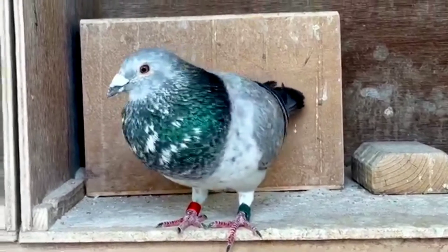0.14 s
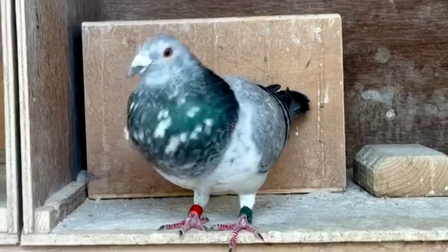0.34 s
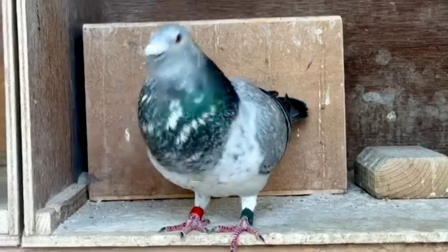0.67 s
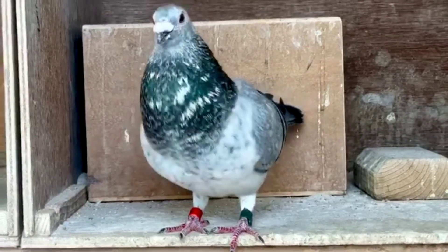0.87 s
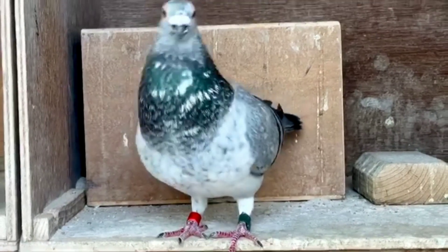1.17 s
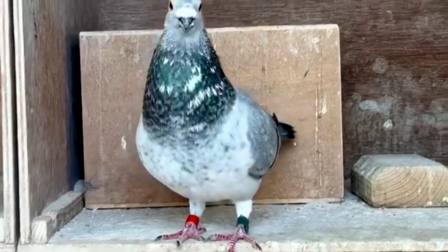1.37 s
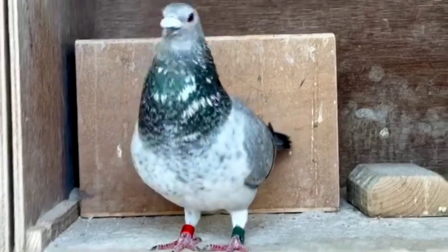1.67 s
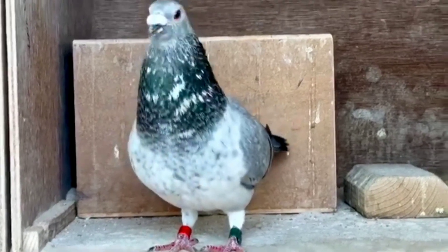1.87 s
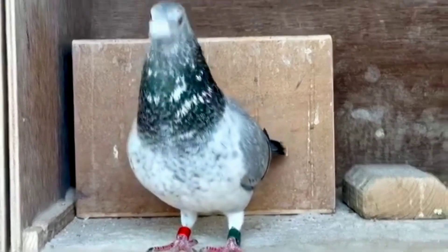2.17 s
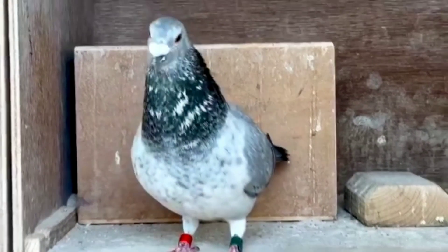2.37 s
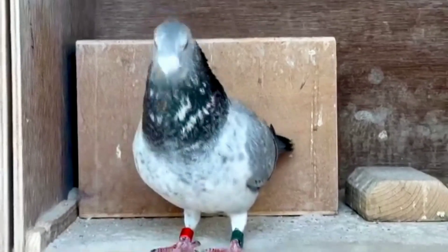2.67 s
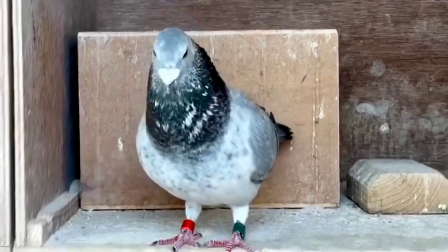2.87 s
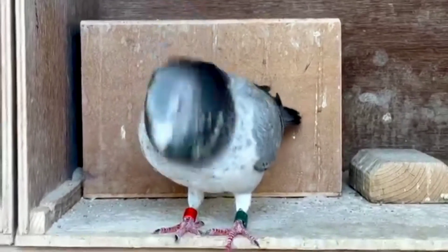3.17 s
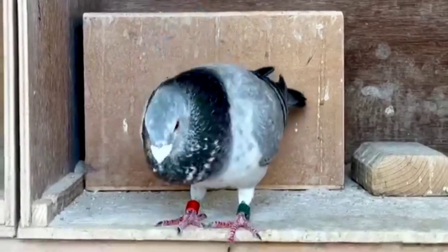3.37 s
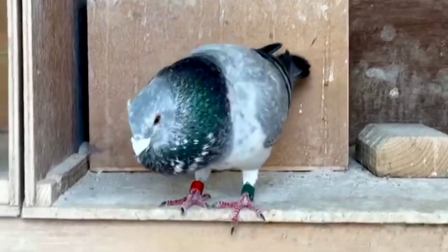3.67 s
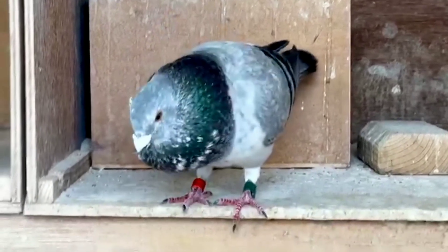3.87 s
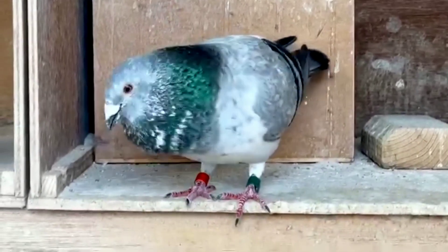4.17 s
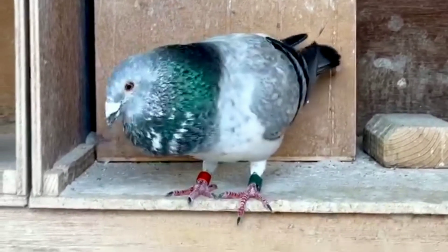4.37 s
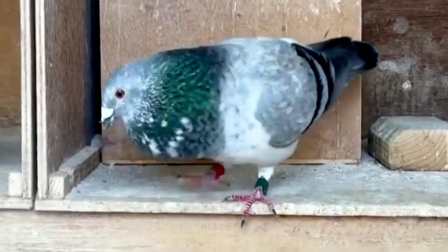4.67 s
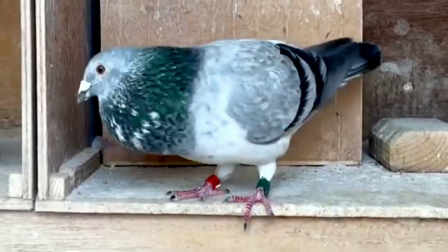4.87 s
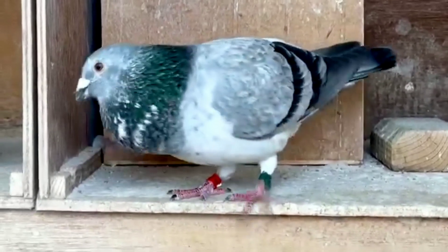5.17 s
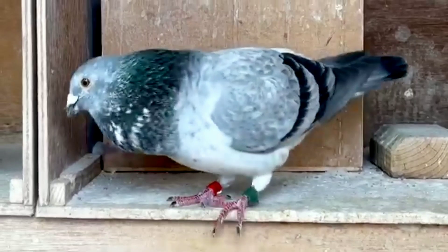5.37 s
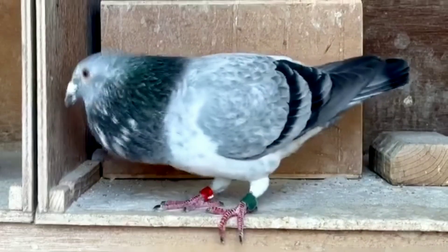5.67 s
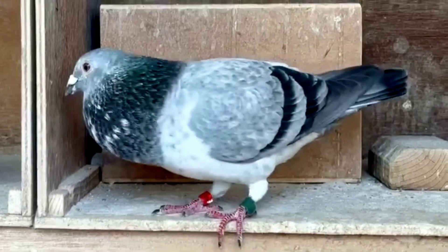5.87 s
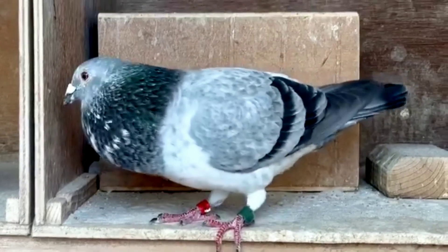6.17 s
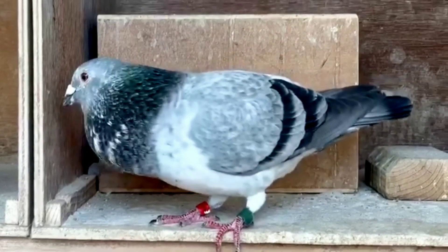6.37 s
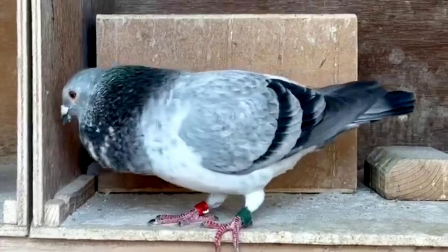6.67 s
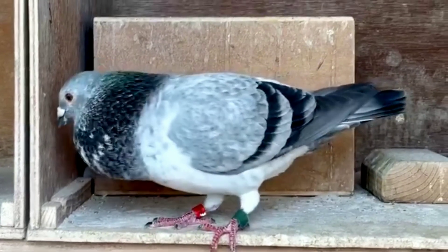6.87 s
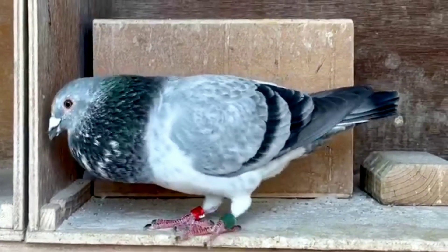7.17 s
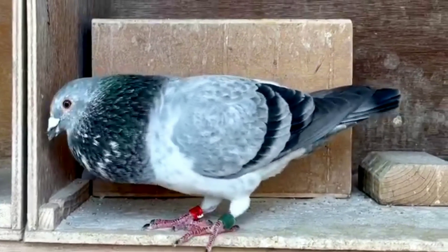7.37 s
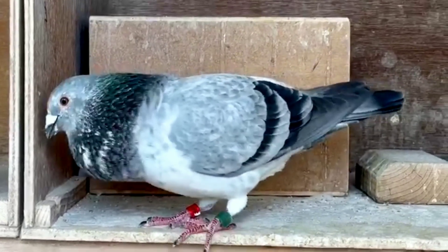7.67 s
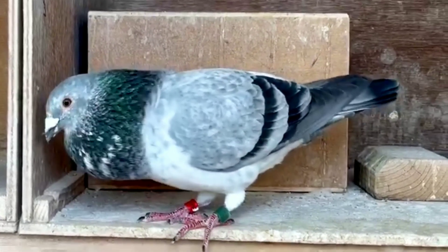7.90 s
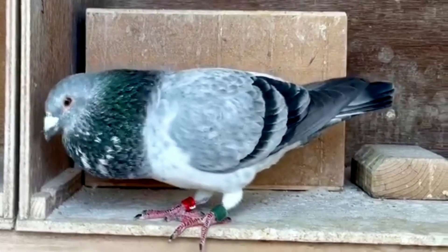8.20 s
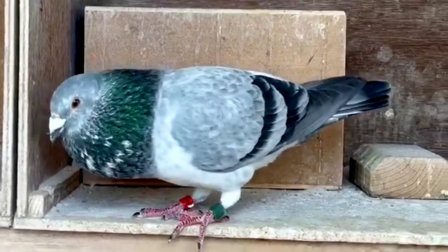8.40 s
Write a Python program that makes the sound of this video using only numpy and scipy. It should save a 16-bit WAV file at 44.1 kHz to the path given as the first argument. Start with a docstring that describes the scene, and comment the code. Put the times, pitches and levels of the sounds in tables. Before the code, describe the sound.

Pigeons coo and growl in a wooden loft; early wingbeats end in low landing thumps, then overlapping throaty coos build louder.

```python
"""Pigeons in a wooden loft

Near birds coo over one another: swept harmonic tones that roll in rough pulses or run almost pure.
Growls are pulsed tones; the flock behind is layers of many short overlapping ones.
One bird flaps past (blurred feather buzz and air noise) and lands with low thumps of ringing board modes,
then a long brush of feathers. Noise swishes and scratches are feathers and feet; thin tones squeak faintly.
Low noise rumbles, a soft stir of noise lies under it all, and a dense noise tail gives the wooden walls."""
import sys
import numpy as np
from scipy import signal
from scipy.io import wavfile
from scipy.ndimage import uniform_filter1d

SR = 44100
rng = np.random.default_rng(int(sys.argv[2]) if len(sys.argv) > 2 else 0)


def dump_mix(stems):
    """Bounce the given channels to the path in sys.argv[1] as a 16-bit WAV at rate SR."""
    frames = np.atleast_2d(stems).T  # one column per channel
    limited = np.clip(frames, -1, 1)  # hard clip at full scale
    pcm = np.round(limited * 32767).astype(np.int16)
    wavfile.write(sys.argv[1], SR, pcm)


N = 376613
TIME = np.arange(N) / SR

# Levels in the tables are those of each layer before its own filters and the trims in scene().

# Long coos of the nearest birds: (second harmonic level/dB, third harmonic level/dB, curve);
# harmonics at the loudest point; curve rows: (t/s, f/Hz, level/dB, roll depth 0-1)
LONG_COOS = [ (-56, -72, [(2.6, 281.7, -42, 0.2), (2.646, 291.4, -26.5, 0), (2.718, 312.7, -39, 0.1),
             (2.778, 288.3, -33, 0.3), (2.8, 279.1, -48, 0.1)]), (-54, -63.5, [(4.3, 128.4, -51, 0.4),
             (4.316, 134.6, -42, 0.4), (4.464, 183.9, -37, 0.4), (4.586, 225.9, -30, 0.4),
             (4.702, 248.3, -29, 0.4), (4.83, 245.7, -36, 0.4), (4.87, 235.3, -34, 0.4)]),
             (-45.5, -64.5, [(5.35, 154.3, -36.5, 0.04), (5.452, 209, -36.5, 0),
             (5.528, 223.5, -32.5, 0.15), (5.594, 237.7, -41, 0), (5.82, 254.3, -28.5, 0.34),
             (5.95, 270.3, -21.5, 0.08), (6.106, 264.4, -27, 0.1), (6.26, 244, -31.5, 0.1)]),
             (-48.5, -58, [(5.53, 288, -32, 0.4), (5.64, 306.7, -26.5, 0.3), (5.69, 325, -18.5, 0.15),
             (5.75, 318, -20.5, 0.27), (5.84, 322.8, -16.5, 0.1), (5.86, 313.5, -24.5, 0.24),
             (5.97, 277.1, -29, 0.44), (6.04, 246, -24.5, 0.36), (6.11, 181, -37.5, 0.46)]),
             (-59, -66.5, [(6.47, 301.5, -25.5, 0.02), (6.53, 311, -22, 0.5), (6.575, 324.3, -15.5, 0.25),
             (6.61, 326, -25.5, 0.15), (6.66, 326, -15, 0.37), (6.74, 304.6, -28.5, 0.5)]),
             (-56.5, -62.5, [(6.75, 266.6, -30, 0.3), (6.826, 274, -24, 0.27), (6.836, 278.1, -32, 0.3),
             (6.918, 305, -29, 0.4), (7.098, 270.1, -28.5, 0.45), (7.108, 266.3, -33, 0.2),
             (7.17, 259.5, -34, 0.3)]), (-55, -62.5, [(7.18, 262.7, -26, 0.4), (7.33, 302, -22, 0.9),
             (7.37, 312.6, -14.5, 0), (7.43, 317, -11.5, 0), (7.51, 312, -15, 0.15),
             (7.55, 335.3, -21, 0.37), (7.58, 354, -28.5, 0.55)]), (-56.5, -67.5, [(7.585, 352, -20.5, 1),
             (7.62, 331.4, -24.5, 0.68), (7.65, 322.5, -14, 0.26), (7.71, 316.5, -14.5, 0.04),
             (7.75, 295.2, -23.5, 0.04), (7.85, 273.9, -22.5, 0.75), (7.93, 249, -30, 0.37)]),
             (-50.5, -63.5, [(7.98, 297.2, -28.5, 0.6), (8.05, 319.8, -22.5, 0), (8.15, 321, -16, 0.16),
             (8.18, 341, -22, 0.7), (8.25, 333, -19.5, 0.27), (8.37, 321.6, -11.5, 0),
             (8.427, 321, -12.5, 0), (8.45, 299, -31.5, .2), (8.53, 253.6, -31, 0.44)]), ]
RASP_DB, RASP_BAND_HZ = -55, (470, 850)   # air that puffs through the throat with each pulse of the roll


def long_coos(jitter, roll_hz, unevenness, follow, blur_hz, blur):
    """One unbroken glide per coo: pulses set its roll and rasp, and faint overtones waver above."""
    out = np.zeros(N)
    air = rms_one(butter(rng.standard_normal(N), RASP_BAND_HZ, "band", order=3))
    for second_db, third_db, curve in LONG_COOS:
        at, t, gate = call_span(curve, fade_s=.02)
        size = len(t)
        hz, level_db, roll = in_time(curve, t)
        phase = turns(hz * (1 + jitter * drift(110, size)))
        cycle = turns(roll_hz * np.exp(unevenness * drift(40, size)))
        tone = from_db(level_db) * (1 + roll * np.sin(cycle)) * np.sin(phase)
        for k, harmonic_db in (2, second_db), (3, third_db):
            # overtones follow only a share of the level's fall from its crest
            overtone_db = harmonic_db + follow * (level_db - level_db.max())
            wavering = 1 + blur * narrow_noise(blur_hz, size)
            tone += from_db(overtone_db) * np.real(wavering * np.exp(1j * k * phase))
        puffs = np.maximum(np.sin(cycle), 0) ** 2
        rasp = from_db(RASP_DB) * roll * puffs * air[at]
        out[at] += np.sqrt(2) * gate * (tone + rasp)
    return out


# Short coos, each an arch of effort: (start t/s, rise/s, fall/s, start f/Hz, crest f/Hz, end f/Hz,
# crest level/dB, swell from start to crest/dB, overtone level/dB against the fundamental)
COOS = [ (0.0, 0.021, 0.1, 305, 316.7, 288, -16.5, -8.5, -12),
        (0.04, 0.23, 0.056, 337.2, 324, 300, -18, 11.5, -18),
        (0.151, 0.083, 0.14, 294.7, 276.4, 271, -26, 2, -28),
        (0.41, 0.031, 0.088, 323.5, 322, 309, -28, 10, -6),
        (0.549, 0.061, 0.12, 336, 324, 299.5, -39.5, -10, -2),
        (0.71, 0.074, 0.04, 194.3, 224, 250, -30.5, 8.5, -3),
        (2.02, 0.047, 0.043, 279, 286, 277, -40, -4, 12), (2.27, 0.011, 0.044, 320, 293, 300, -31, 13, 5),
        (2.32, 0.13, 0.06, 159, 161, 160, -38, -4, -21), (2.44, 0.027, 0.13, 299.5, 274.3, 273, -34, 10, 0),
        (2.947, 0.021, 0.055, 281, 279, 280, -44, 4, 16),
        (3.11, 0.074, 0.26, 216.5, 239, 208, -34.5, -4, -4.5),
        (3.17, 0.074, 0.11, 107.2, 113.1, 107, -44, -2, -1),
        (3.291, 0.033, 0.17, 177, 167.7, 156, -33.5, 4, -23),
        (3.46, .17, 0.068, 221.8, 238.3, 234, -26.5, 11, -5.5),
        (3.73, 0.036, 0.1, 231, 225.5, 168.4, -21.5, 3, -6.5),
        (3.941, 0.028, 0.12, 247, 254, 264.5, -19.5, 8, -4.5),
        (4.1, 0.047, 0.19, 258, 262.6, 244.2, -24, -2, -2),
        (4.13, 0.047, 0.14, 321, 321.7, 325, -27, 2, -18),
        (4.661, 0.27, 0.19, 327, 314.7, 295, -29.5, 12, 10.5),
        (5.19, 0.074, 0.12, 289.7, 302.8, 268, -24.5, 8, 2.5),
        (6.209, 0.067, 0.042, 258.7, 293.6, 287, -26, 15, 0.5),
        (6.9, 0.083, 0.1, 318, 321.5, 321, -27, 6, -3.5),
        (6.91, 0.11, 0.079, 188.4, 224, 254, -26, 8.5, -8.5),
        (7.26, 0.034, 0.05, 182.7, 205.4, 232, -24, 9, -5),
        (7.78, 0.14, 0.046, 125.1, 207.3, 214.6, -31.5, 4, 1.5),
        (7.87, 0.041, 0.037, 299, 318, 316, -21, 7, 0.5), ]
# What the inflated crop passes: (f/Hz, level/dB)
CROP = [(140, -6), (195, -6.5), (250, -4.5), (320, -0.5), (400, 3.5), (500, -13.5), (640, -32),
        (960, -41.5), (1300, -56)]
# loss by the end of a coo; how late the level and the pitch give way (exponents)
COO_FADE_DB, SWELL_CURVE, DROOP_CURVE = 7, 1.25, 1.6


def hoots(jitter, flutter_db, throb_db, rough, clean_db, third_db, blur, fade_s):
    """Level and pitch arch with effort, the crop colours the harmonics; soft parts roll, loud parts run clean."""
    out = np.zeros(N)
    for s, rise_s, fall_s, first_hz, crest_hz, last_hz, crest_db, swell_db, overtones_db in COOS:
        at, t, gate = call_span([(s,), (s + rise_s + fall_s,)], fade_s)
        size = len(t)
        to_go = np.clip(1 - (t - s) / rise_s, 0, 1)
        spent = np.clip((t - s - rise_s) / fall_s, 0, 1)
        hz = crest_hz + (first_hz - crest_hz) * to_go ** DROOP_CURVE
        hz += (last_hz - crest_hz) * spent ** DROOP_CURVE
        level_db = crest_db - swell_db * to_go ** SWELL_CURVE - COO_FADE_DB * spent ** SWELL_CURVE
        phase = turns(hz * (1 + jitter * drift(90, size)))
        roll = np.sin(turns(72 * (1 + .35 * drift(45, size))))   # about 72 pulses per second
        looseness = 1 / (1 + from_db(level_db - clean_db))   # near 1 when soft, near 0 when loud
        tone = from_db(at_hz(CROP, hz)) * np.sin(phase)
        for k, harmonic_db in (2, overtones_db), (3, overtones_db + third_db):
            gain = from_db(harmonic_db + at_hz(CROP, k * hz))
            tone += gain * np.sin(k * phase + blur * drift(130, size))
        unsteady_db = flutter_db * drift(50, size) + throb_db * drift(21, size)
        level = from_db(level_db + looseness * unsteady_db)
        out[at] += gate * np.sqrt(2) * tone * (1 + rough * looseness * roll) * level
    return out


# Rolling growls: (crest t/s, level/dB, rise/s, fall/s, f/Hz at the crest, glide in octaves per s)
GROWLS = [ (.1, -39.5, 0.071, 0.1, 501.4, -0.5), (0.249, -26, 0.036, 0.036, 386, -2),
          (.45, -34, 0.034, 0.06, 415, 1), (0.665, -32, .025, .025, 411.4, 0),
          (0.751, -33.5, .04, 0.035, 375.5, -1.5), (0.871, -36, 0.042, 0.027, 426, -1.5),
          (1.674, -46.5, .02, 0.018, 433, 1), (1.896, -41, .02, 0.014, 419, -1.5),
          (1.91, -47.5, .018, 0.033, 614, 0.5), (2.07, -45, 0.038, 0.027, 469, -3),
          (2.33, -41.5, .025, 0.025, 423.6, 1), (2.54, -50, 0.07, 0.092, 542, 0.5),
          (1.969, -44, 0.028, 0.02, 400, 1.5), (2.211, -33, 0.033, 0.025, 412, 1.5),
          (2.215, -36.5, .035, 0.031, 366.4, 0), (2.691, -40, 0.039, 0.11, 437, -1.7),
          (2.809, -34, .035, 0.079, 418.6, 0.5), (3.14, -38.5, .03, 0.041, 441, 0),
          (3.27, -37.5, .04, 0.048, 416, 0), (3.249, -45, .06, 0.068, 495, -0.5),
          (3.879, -41, .1, 0.068, 498, 1), (3.59, -32.5, 0.049, 0.066, 368, 3),
          (3.86, -26.5, 0.059, 0.06, 390, 1), (3.98, -32.5, 0.029, 0.082, 368, 1),
          (4.16, -30.5, 0.038, 0.052, 421, 1), (4.26, -25, .035, 0.046, 417.2, -2),
          (4.52, -26.5, .06, 0.063, 388.5, 2.5), (4.73, -31.5, 0.14, 0.094, 423.7, 1.8),
          (4.93, -21, .04, 0.02, 395.7, -0.85), (5.031, -38, 0.031, 0.17, 392.4, -3.5),
          (5.46, -22.5, .05, 0.055, 398.4, 2.5), (5.86, -38.5, .09, 0.083, 515.4, 1),
          (5.999, -28.5, .05, 0.023, 413, 1), (6.09, -22.5, .025, 0.018, 398, 0.5),
          (6.26, -29.5, 0.029, 0.18, 405.8, 1.1), (6.48, -29.5, 0.031, 0.094, 421, -1.1),
          (6.68, -28, .025, 0.041, 396, -1), (7.02, -30.5, 0.059, 0.12, 405.7, 0.3),
          (7.169, -41.5, 0.052, 0.08, 515, 0), (7.299, -24, 0.037, 0.032, 415.8, 2.5),
          (7.459, -24.5, 0.073, 0.051, 403, 1.2), (7.879, -22.5, 0.034, 0.016, 397.7, 4),
          (8.01, -23, 0.039, 0.016, 395.4, -1.5), (8.222, -28.5, 0.035, 0.022, 404, 0.5),
          (8.517, -25, .05, 0.022, 424, 1.5), ]


def growls(pan_db):
    """Rough notes of uneven throat pulses that swell, glide and die, each with its own place."""
    out = np.zeros((2, N))
    for s, level_db, rise_s, fall_s, hz, glide in GROWLS:
        at, t, gate = call_span([(s - 2 * rise_s,), (s + 2 * fall_s,)], fade_s=.02)
        gliding_hz = hz * 2 ** (glide * (t - s))
        note = rolled_tone(gliding_hz, pulse_rate=68, unevenness=.25, depth=0.52, slip=0.36)
        note = gate * from_db(level_db) * swell(t - s, rise_s, fall_s) * note
        out[:, at] += panned(note, rng.normal(0, pan_db))
    return out


def rolled_tone(hz, pulse_rate, unevenness, depth, slip):
    """The syrinx opens in uneven pulses; each one sets the throat swinging with a small slip of phase."""
    cycle = np.cumsum(pulse_rate * np.exp(unevenness * drift(50, len(hz)))) / SR
    opening = 1 - np.clip(depth, 0, 1) * np.cos(2 * np.pi * cycle)
    slips = np.interp(cycle + 1 / 2, np.arange(400), rng.standard_normal(400))
    return rms_one(opening * np.sin(turns(hz) + slip * slips))


# Thumps on the boards: (t/s, peak level/dB, brightness low-pass f/Hz, lowest high-pass f/Hz)
THUMPS = [(0.439, -23.5, 295, 80), (0.567, -14, 77, 45), (0.924, -4.5, 240, 74.6), (0.95, -12.5, 121, 50),
          (0.999, -9.5, 650, 230), (1.023, -9.5, 900, 190), (1.044, -8.5, 510, 170), (1.071, -13, 152, 70),
          (1.117, -12.5, 158, 75), (1.256, -16, 244, 130), (1.272, -11, 89, 55.3), (1.325, -21, 400, 90)]
# Modes of the boards: (f/Hz, level/dB, t60/s)
BOARD_MODES = [(54.7, 10, 0.08), (81.4, 5.5, 0.15), (114, 2.5, 0.11), (184, 1.5, 0.092), (248, -1, 0.1),
               (310, -2, 0.048), (413.6, -1, 0.082), (520, -5.5, 0.039), (790, -9, 0.034)]


def thumps(uneven_db, detune, side_db):
    """Soft blows ring the board's decaying modes; a harder, lighter contact favours the higher ones."""
    out = np.zeros((2, N))
    t = TIME[:SR // 3]
    for s, peak_db, bright_hz, lowest_hz in THUMPS:
        ring = np.zeros((2, len(t)))
        for k, (hz, level_db, t60) in enumerate(BOARD_MODES):
            decay = from_db(level_db + rng.normal(0, uneven_db) - 60 * t / t60)
            mode = decay * np.sin(2 * np.pi * hz * (1 + detune * rng.normal()) * t)
            ring += (-1) ** k * panned(mode, rng.normal(0, side_db))   # neighbours in opposite phase
        blow = butter(butter(ring, bright_hz, "low"), lowest_hz, "high")
        start = int(s * SR)
        out[:, start:start + len(t)] += from_db(peak_db) * blow / np.abs(blow).max()
    return out


# Wing strokes: (t/s, level/dB, buzz f/Hz at full stroke, rise/s, fall/s)
WINGS = [(0.165, -32, 838.5, .028, .04), (0.298, -31, 915.5, 0.03, 0.047), (0.425, -30, 960, .034, 0.044),
         (0.557, -29.5, 903, 0.02774, .044), (0.678, -34, 786, 0.027, .045)]
# Colour of the rushing air: (f/Hz, level/dB per Hz)
WING_COLOUR = [(500, -8), (850, 4), (1050, -1.5), (1220, -13.5), (1450, -2), (1800, -10.5), (2200, -13),
               (3000, -13.5), (4500, -21), (7000, -17), (10000, -22), (15500, -25)]
STROKE_SAG = .16   # share by which the buzz drops as a stroke slows
BRUSH_S, BRUSH_DB, BRUSH_HZ = 1.482, -36.5, 875   # feathers brush along the wood after the landing
BRUSH_RISE_S, BRUSH_FALL_S = 0.032, 0.28
BRUSH_WIDTH_HZ, BRUSH_BUZZ_DB = 220, -3   # blur rate and level of its buzz
SHUFFLE_S, SHUFFLE_DB, SHUFFLE_WIDTH_S = 1.02, -43, 0.17   # loose feathers while the bird settles


def wings(buzz_db, buzz_fall_db, buzz_width_hz, rush_db, grain_db):
    """Each stroke rushes air through the feathers and sets their edges buzzing; pitch rises with speed."""
    size = 5 * SR // 2   # all wing sounds lie in the first 2.5 s
    t = TIME[:size]
    speeds = np.array([swell(t - s, rise_s, fall_s) for s, level_db, hz, rise_s, fall_s in WINGS])
    strokes = from_db([row[1] for row in WINGS]) @ speeds
    hz = in_time(WINGS, t)[1] * (1 - STROKE_SAG * (1 - speeds.max(axis=0)))
    brush = from_db(BRUSH_DB) * swell(t - BRUSH_S, BRUSH_RISE_S, BRUSH_FALL_S)
    shuffle = from_db(SHUFFLE_DB) * swell(t - SHUFFLE_S, SHUFFLE_WIDTH_S, SHUFFLE_WIDTH_S)
    buzz = from_db(buzz_db) * strokes * feather_buzz(hz, buzz_width_hz, buzz_fall_db)
    brush_buzz = feather_buzz(np.full(size, BRUSH_HZ), BRUSH_WIDTH_HZ, buzz_fall_db)
    buzz += from_db(BRUSH_BUZZ_DB) * brush * brush_buzz
    air = banded_noise(WING_COLOUR, patchy_db=3.0, flicker_rate=45, count=22, size=size)
    rush = from_db(rush_db) * (strokes + brush + shuffle) * air
    grain = from_db(grain_db * drift(400, size) + 1.64 * drift(90, size))
    return np.pad(grain * (buzz + rush), ((0, 0), (0, N - size)))


def feather_buzz(hz, width_hz, fall_db):
    """Three blurred harmonics of fluttering feather edges, each weaker than the one below."""
    phase = turns(hz)
    buzz = np.zeros(len(hz))
    for k in range(1, 4):
        line = narrow_noise(width_hz * k ** .7, len(hz)) * np.exp(1j * k * phase)
        buzz += from_db(-fall_db * (k - 1) ** 1.76) * np.real(line)
    return buzz


# Rustles of feathers and feet: (peak t/s, level/dB, rise/s, tilt/dB: treble up and the rest down by this)
RUSTLES = [(.085, -54, 0.04, 4), (.378, -51, 0.0067, 6), (.69, -54.5, 0.026, -2), (0.852, -64.5, 0.2, 8),
           (1.924, -57, 0.0064, 8), (1.964, -57.5, 0.021, -13), (2.105, -57.5, 0.018, -1.5),
           (2.32, -57, 0.042, -3), (2.577, -50, 0.011, 2.5), (2.826, -50.5, 0.035, -2),
           (3.042, -45.5, 0.0031, 3), (3.267, -53, 0.0033, -1), (3.298, -47, 0.021, 0),
           (3.465, -48.5, 0.0022, 2), (3.523, -44.5, 0.018, -1.5), (3.731, -40, 0.014, -0.5),
           (3.867, -54.5, 0.02, -1), (3.93, -44.5, 0.014, 4), (4.132, -41, 0.0089, 0),
           (4.24, -60, .02, -7.5), (4.329, -48, 0.019, 1.5), (4.488, -52, 0.0025, 2),
           (4.565, -54.5, 0.02, 3), (4.65, -48.5, 0.0017, -3), (4.788, -46.5, 0.019, -1.5),
           (4.96, -65, 0.034, 8.5), (5.081, -48.5, 0.014, -6), (5.31, -53.5, 0.039, -5.5),
           (5.565, -49, 0.0033, 0.5), (5.604, -53, 0.023, -5), (5.82, -59, 0.061, -5.5),
           (5.979, -64, 0.039, -4.5), (6.189, -59.5, 0.04, -1), (6.3, -60, 0.015, -6.5),
           (6.495, -55.5, 0.017, -2), (6.549, -56.5, 0.0067, 4.5), (6.799, -58.5, 0.025, -5.5),
           (7.08, -58.5, 0.056, -5), (7.424, -55.5, 0.0053, -8.5), (7.46, -66, 0.011, -4.5),
           (7.735, -52.5, 0.013, -4.5), (8.076, -57, 0.004, -7), (8.115, -59.5, 0.018, -7.5),
           (8.241, -62, 0.03, -6), (8.387, -55.5, 0.019, 0.5)]
# Colour of the rustles: (f/Hz, level/dB per Hz)
RUSTLE_COLOUR = [(600, 5.5), (1200, -2.5), (2200, -7), (3600, -6), (5000, -8), (7500, -5.5), (10000, -13),
                 (12500, -8.5), (15500, -10)]
RUSTLE_FALL_S, RUSTLE_LINGER = .017, .8   # a rustle dies in this time plus a share of its rise
RUSTLE_TAIL_DB, RUSTLE_TAIL_S = -13, 0.073   # and leaves a faint tail in the nest box


def rustles(grain_db, clump_db, split_hz):
    """Short grainy noise swishes that swell and die; the crisper ones carry more treble."""
    noise = banded_noise(RUSTLE_COLOUR, patchy_db=2.5, flicker_rate=40, count=24)
    # the 700-per-second grain holds still once drift() has used its points, after about 5.7 s
    noise = noise * from_db(grain_db * drift(700) + clump_db * drift(130))
    noise = from_db(1.3) * evened(noise, over_s=.03)
    dull = butter(noise, split_hz, "low", order=1)
    low, high = np.zeros(N), np.zeros(N)
    for s, level_db, rise_s, tilt_db in RUSTLES:
        fall_s = RUSTLE_FALL_S + RUSTLE_LINGER * rise_s
        # a peak before 0.2 s makes this slice empty, so that rustle is silent
        at = slice(int((s - .2) * SR), int((s + .4) * SR))
        t = TIME[at] - s
        tail = np.log(from_db(RUSTLE_TAIL_DB)) - t / RUSTLE_TAIL_S
        swish = from_db(level_db) * np.exp(np.minimum(t / rise_s, np.maximum(-t / fall_s, tail)))
        low[at] += swish * from_db(-tilt_db)
        high[at] += swish * from_db(tilt_db)
    return low * dull + high * (noise - dull)


# Claws tapping and scraping on wood: (t/s, level/dB, ring f/Hz, width in octaves, decay to 1/e in s)
CLAWS = [(1.038, -43.5, 1410, 0.28, 0.036), (1.325, -45.5, 1390, 0.21, 0.039),
         (1.757, -40, 790, 0.2, 0.035), (1.956, -49, 2500, 0.062, 0.02), (2.272, -56, 645, 0.48, 0.02),
         (2.751, -55.5, 895, 5.6, 0.014), (3.215, -55, 1160, 0.83, 0.097), (3.368, -43, 575, 0.17, 0.031),
         (3.517, -65, 2800, 0.76, 0.1), (3.721, -43, 3250, 0.46, 0.027), (4.195, -42, 576, 0.2, 0.039),
         (4.223, -53, 1180, 0.17, 0.081), (7.417, -50, 1990, 0.84, 0.011), (8.208, -50.5, 1617, .2, 0.027)]


def claws():
    """A short scratch excites one resonance of the wood: a band of noise that dies away."""
    out = np.zeros(N)
    t = TIME[:SR // 3]
    for s, level_db, hz, octaves, decay_s in CLAWS:
        band = [hz * 2 ** (-octaves / 2), hz * 2 ** (octaves / 2)]
        scratch = rms_one(butter(rng.standard_normal(len(t)), band, "band"))
        scratch = from_db(level_db) * scratch * np.exp(-t / decay_s)
        start = int(s * SR)
        out[start:start + len(t)] += scratch[:N - start]
    return out


# Deep, middle and high voices of the flock, and the faint upper ones, against the flock's level
DEEP_DB, MIDDLE_DB, HIGH_DB, UPPER_DB = -6.5, -0.5, -7.5, -28.5
DEEP_LIMIT_DB = -34   # above this flock level the deep voices grow no louder
# The flock further off: (t/s, level/dB)
FLOCK = [(0, -32.5), (.85, -39), (1.05, -35), (1.3, -41), (1.65, -48), (2.5, -47), (2.8, -41), (3.05, -47),
         (3.15, -39.5), (3.6, -36.5), (4.2, -32.5), (4.8, -30.5), (5.15, -31), (6.5, -29), (7.25, -28),
         (7.72, -37), (7.9, -31), (8.54, -27.5)]


def flock():
    """Deep, middle and high voices from the other nest boxes, with a faint layer of upper voices."""
    level_db, = in_time(FLOCK)
    deep_gain = from_db(DEEP_DB - np.maximum(level_db - DEEP_LIMIT_DB, 0))
    deep = deep_gain * far_voices(pitch_hz=207, spread=0.095, arch=.08, pan_db=0.0, count=90)
    middle = from_db(MIDDLE_DB) * far_voices(pitch_hz=305.4, spread=.15, arch=0.0792, pan_db=8, count=120)
    high = from_db(HIGH_DB) * far_voices(pitch_hz=452.4, spread=0.041, arch=.05, pan_db=7.5, count=100)
    upper = from_db(UPPER_DB) * far_voices(pitch_hz=699, spread=0.13, arch=.06, pan_db=8, count=130)
    murmur = butter(deep + middle + high, [120, 680], "band", order=4)
    return from_db(level_db) * (murmur + upper)


def far_voices(pitch_hz, spread, arch, pan_db, count):
    """Many short overlapping notes, each arching about its own pitch; evened to an rms near 1."""
    out = np.zeros((2, N))
    for k in range(count):
        middle = (k + rng.random() / 2) / count * N / SR
        length = rng.uniform(.1, .24)
        at, t, gate = call_span([(middle - length / 2,), (middle + length / 2,)], fade_s=.08)
        crest = middle + length * rng.uniform(-.3, 0.3033)
        own_pitch = spread * np.clip(rng.normal(), -2, 2)
        bend = arch * (np.cos(np.pi * (t - crest) / length) - 1 / 2)
        hz = pitch_hz * np.exp(own_pitch + bend)
        note = rolled_tone(hz, pulse_rate=60, unevenness=.5, depth=0.56, slip=0.48)
        note = gate * note * from_db(4.0 * drift(14, len(t)))
        out[:, at] += panned(note, rng.normal(0, pan_db))
    return out / np.sqrt(uniform_filter1d(np.mean(out ** 2, axis=0), SR // 8) + 1e-3)


SQUEAK_S, SQUEAK_OCTAVES_PER_S = 0.028, -0.3   # rise and fall time; glide
# Faint squeaks of a bird further off: (crest t/s, level/dB, f/Hz at the crest)
SQUEAKS = [(5.315, -63, 3600), (5.345, -64, 3130), (5.39, -61.5, 2880), (5.385, -63, 3620),
           (5.43, -64.5, 3720), (5.75, -63, 3600), (5.86, -64, 3750), (6.31, -66, 4600), (6.66, -67, 6450)]


def squeaks(width_hz):
    """Thin, almost level notes, blurred by slow noise on the carrier."""
    out = np.zeros(N)
    t = TIME[:SR // 5] - .1
    for s, level_db, hz in SQUEAKS:
        phase = turns(hz * 2 ** (SQUEAK_OCTAVES_PER_S * t))
        note = np.real(narrow_noise(width_hz, len(t)) * np.exp(1j * phase))
        at = int((s + t[0]) * SR) + np.arange(len(t))
        out[at] += from_db(level_db) * swell(t, SQUEAK_S, SQUEAK_S) * note
    return out


RUMBLE_FLOOR_DB, RUMBLE_FLOOR_HZ = -52, 70   # steady floor, and its lower edge
# Low swells of stirred air and shaking boards: (crest t/s, level/dB, rise/s, fall/s)
RUMBLES = [(.33, -33, .05, .06), (.42, -31, .04, .06), (.54, -31, .03, .07), (.68, -35, .04, .1),
           (.95, -23, 0.03, 0.05), (1.12, -25.5, .1, .12), (1.35, -30, 0.08, 0.1), (1.54, -32, .05, .08),
           (1.75, -47, .1, .6), (4.76, -36, 0.08, 0.12), (5.0, -44, 0.6, .3), (5.72, -43, 0.14, 0.4)]
# Colour of the rumble: (f/Hz, level/dB per Hz)
RUMBLE_COLOUR = [(15, -12), (25, -2), (45, 3), (58, 4), (83, 0), (120, -7), (160, -18), (250, -45)]


def rumble(lumps_db):
    """Deep, lumpy buffets of low noise over a faint steady floor."""
    gain = np.zeros(N)
    for s, level_db, rise_s, fall_s in RUMBLES:
        gain += from_db(level_db) * swell(TIME - s, rise_s, fall_s)
    noise = banded_noise(RUMBLE_COLOUR, patchy_db=2.0, flicker_rate=45, count=6)
    buffets = gain * from_db(lumps_db * drift(30)) * evened(noise, over_s=.12)
    floor = from_db(RUMBLE_FLOOR_DB) * butter(noise, RUMBLE_FLOOR_HZ, "high", order=1)
    return buffets + floor


# Soft stir of the loft: (t/s, level/dB)
STIR = [(0, -50), (.36, -41), (.9, -51.5), (1.6, -47), (1.87, -54), (2.05, -59.5), (3.1, -55.5), (3.8, -54),
        (5.8, -55.5), (6.5, -56.5), (7.1, -60.5), (7.28, -63.5), (7.5, -61.5), (7.65, -62.5), (8.2, -54.5),
        (8.54, -58)]
# Colour of the stir: (f/Hz, level/dB per Hz)
STIR_COLOUR = [(170, -6.5), (300, -2.5), (450, 3), (700, -2.5), (1000, -8), (2000, -18), (4000, -24.5),
               (7000, -23), (10000, -40.5), (12500, -32), (15500, -31)]


def loft_stir():
    """Coloured, flickering noise whose level slowly wanders behind everything."""
    level_db, = in_time(STIR)
    return from_db(level_db + 2.5) * banded_noise(STIR_COLOUR, patchy_db=2.5, flicker_rate=18)


LOFT_T60_S = 0.55


def loft(x, wall_hz):
    """Dense reflections off wooden walls: a decaying noise tail, different at each side."""
    t = TIME[:SR // 2]
    tail = rng.standard_normal((2, len(t))) * from_db(-60 * t / LOFT_T60_S) * (t > .004)
    tail /= np.sqrt(np.sum(tail ** 2, axis=1, keepdims=True))
    return signal.fftconvolve(butter(x, wall_hz, "low"), tail, axes=1)[:, :N]


# Left-right likeness of the noises: (f/Hz, correlation 0-1)
LIKENESS = [(40, 1), (300, 0.77), (600, 0.58), (1100, 0.23), (1600, 1), (4600, 1), (6300, 1), (9500, 0.19),
            (14000, 1)]


def banded_noise(spectrum, patchy_db, flicker_rate, count=12, size=N):
    """Stereo noise in bands, each flickering by itself; rms 1."""
    out = np.zeros((2, size))   # mid and side
    white = rng.standard_normal((2, 2, size))
    edges = np.geomspace(spectrum[0][0], min(spectrum[-1][0], .45 * SR), count + 1)
    for k, (low, high) in enumerate(zip(edges, edges[1:])):
        hz = np.sqrt(low * high)
        alike = np.clip(at_hz(LIKENESS, hz), 0, 1)
        # the flicker is drawn once every 20 samples
        flicker_db = patchy_db * drift(flicker_rate * 20, size // 20 + 1)
        gain = from_db(at_hz(spectrum, hz) + flicker_db) * np.sqrt([[1 + alike], [1 - alike]])
        out += butter(white[k % 2], [low, high], "band") * np.repeat(gain, 20, axis=1)[:, :size]
    mid, side = out
    return rms_one(np.array([mid + side, mid - side]))


def evened(x, over_s):
    """Stereo noise with its fine grain kept and its slow swings taken out; rms near 1."""
    return x / np.sqrt(uniform_filter1d(np.mean(x ** 2, axis=0), int(over_s * SR) + 1) + 1e-6)


def narrow_noise(rate, size):
    """Slow complex noise: on a carrier it makes a rough, blurred line."""
    return (drift(rate, size) + 1j * drift(rate, size)) * np.sqrt(3) / 2


def drift(rate, size=N):
    """Straight lines between normal random points, `rate` a second; holds after 4000 points."""
    at = np.arange(size) * rate / SR
    return np.interp(at, np.arange(4000), rng.standard_normal(4000))


def swell(t, rise_s, fall_s):
    """A rounded rise to 1 at t = 0, and a rounded fall."""
    return np.exp(-np.minimum((t / np.where(t < 0, rise_s, fall_s)) ** 2, 50))


def call_span(rows, fade_s):
    """Samples, times and softly edged gate of one call."""
    start, end = rows[0][0] - fade_s / 2, rows[-1][0] + fade_s / 2
    at = np.arange(max(int(start * SR), 0), min(int(end * SR), N))
    edge = np.clip(np.minimum(at / SR - start, end - at / SR) / fade_s, 0, 1)
    return at, at / SR, np.sin(edge * np.pi / 2) ** 2


def turns(hz):
    """Phase in radians of a tone with this pitch curve."""
    return 2 * np.pi * np.cumsum(hz) / SR


def panned(x, pan_db):
    """Mono to stereo or stereo rebalanced: left up and right down by half of pan_db each."""
    return x * from_db([[pan_db / 2], [-pan_db / 2]])


def butter(x, hz, kind, order=2):
    """Butterworth filter."""
    return signal.sosfilt(signal.butter(order, hz, kind, fs=SR, output="sos"), x)


def in_time(rows, t=TIME):
    """The columns of a curve, read at times t."""
    s, *columns = np.transpose(rows)
    return [np.interp(t, s, c) for c in columns]


def at_hz(points, hz):
    """A frequency curve read at hz, straight between points on a log scale."""
    points = np.array(points)
    return np.interp(np.log(hz), np.log(points[:, 0]), points[:, 1])


def from_db(db):
    """Decibels to amplitude."""
    return np.exp(np.asarray(db) * (np.log(10) / 20))


def rms_one(x):
    """Scale to an rms of 1."""
    return x / np.sqrt(np.mean(x ** 2) + 1e-20)


def scene():
    """Near birds, others, feathers, rumble and stir, with the loft's echo around the first three."""
    short = hoots(jitter=0.011, flutter_db=6.0, throb_db=2.5, rough=0.48, clean_db=-24.0,
                  third_db=-3.5, blur=0.98, fade_s=0.02006)
    long = long_coos(jitter=0.0041, roll_hz=57.74, unevenness=.25, follow=.27, blur_hz=45.7, blur=.55)
    landing = from_db(0.5) * thumps(uneven_db=3.5, detune=0.053, side_db=2.5)
    near = panned(from_db(-1.68) * short + long, .1) + panned(landing, -0.98)
    others = growls(pan_db=3.5) + from_db(-0.96) * flock()
    feathers = from_db(-2.0) * wings(buzz_db=-4.5, buzz_fall_db=5.5, buzz_width_hz=210,
                                     rush_db=-5.5, grain_db=2.5)
    feathers += from_db(0.64) * rustles(grain_db=2.6, clump_db=2.0, split_hz=3600)
    feathers += from_db(-0.5) * claws() + squeaks(width_hz=170)
    background = from_db(-2.5) * rumble(lumps_db=2.5) + loft_stir()
    send = from_db(-11.5) * near + from_db(-7.0) * others + from_db(-21.5) * feathers
    echo = loft(send, wall_hz=7120)
    # widen the echo of the upper notes: add its left-right difference with opposite signs
    across = from_db(4.5) * butter(echo[0] - echo[1], [400, 1100], "band") / 2
    return near + others + feathers + background + echo + across * [[1], [-1]]


CUTOFF_HZ = 15700


def record(dry):
    """The microphone loses the deepest bass; the top is cut steeply."""
    bass_cut = butter(dry, 36, "high", order=3)
    top_cut = signal.ellip(10, .1, 80, CUTOFF_HZ, fs=SR, output="sos")
    return signal.sosfilt(top_cut, bass_cut)


dry = scene()
out = record(dry)
dump_mix(out)
```